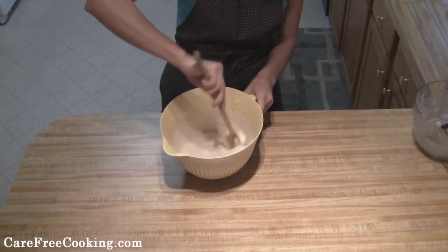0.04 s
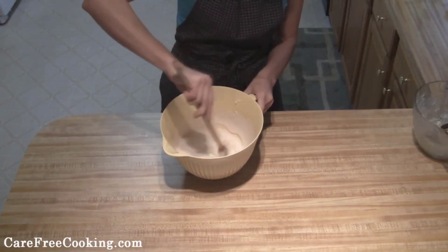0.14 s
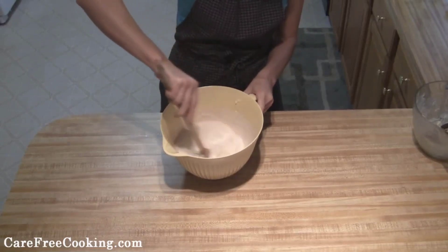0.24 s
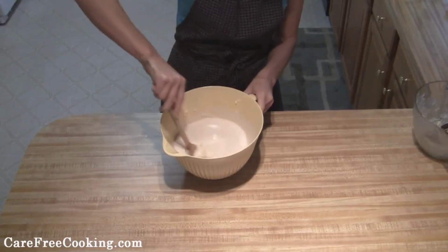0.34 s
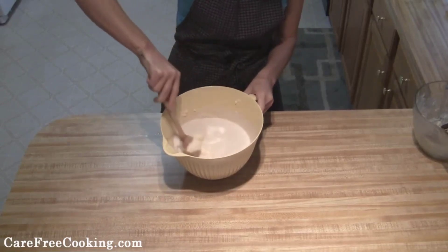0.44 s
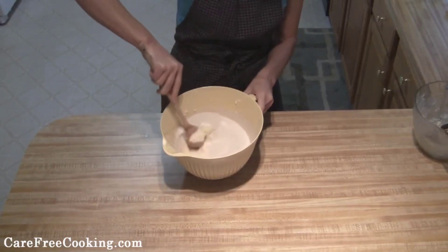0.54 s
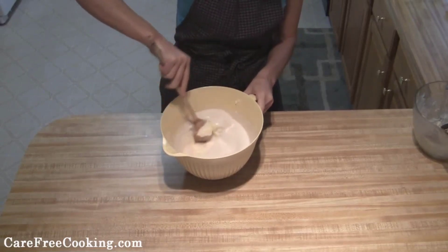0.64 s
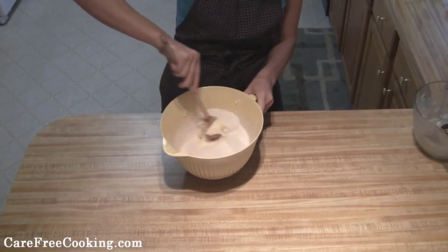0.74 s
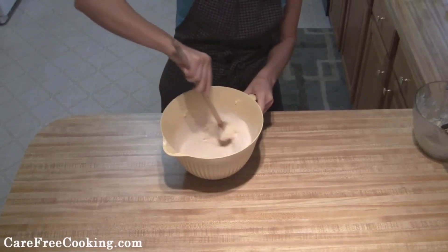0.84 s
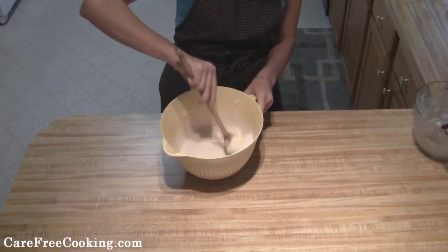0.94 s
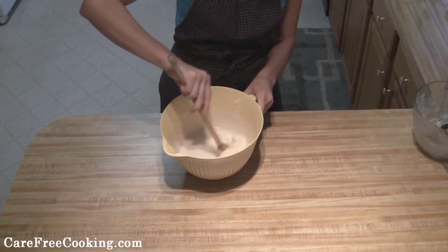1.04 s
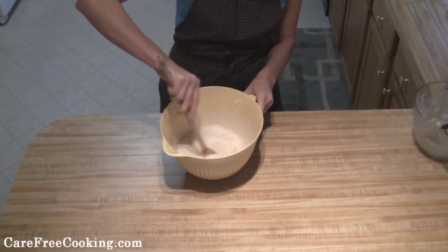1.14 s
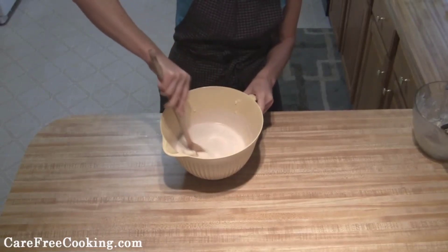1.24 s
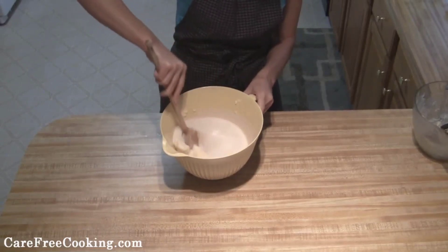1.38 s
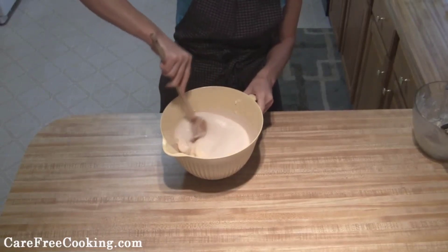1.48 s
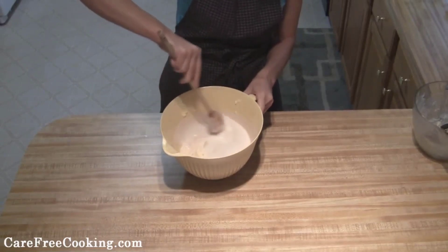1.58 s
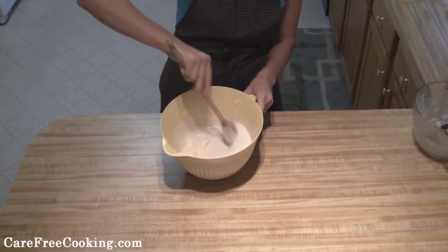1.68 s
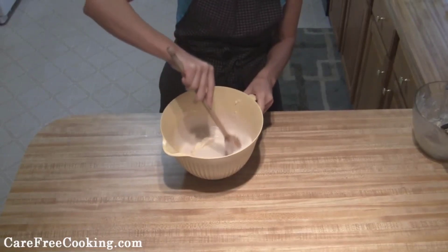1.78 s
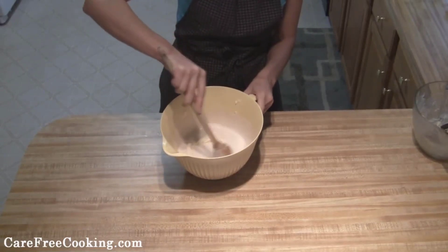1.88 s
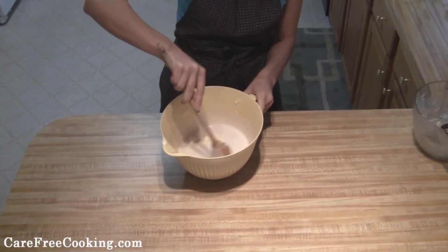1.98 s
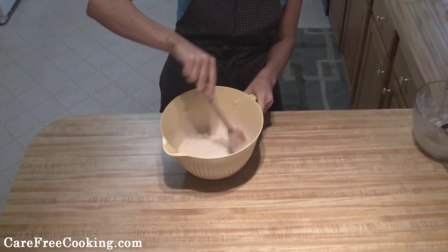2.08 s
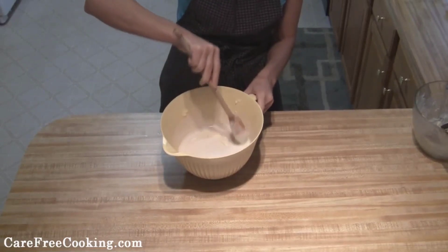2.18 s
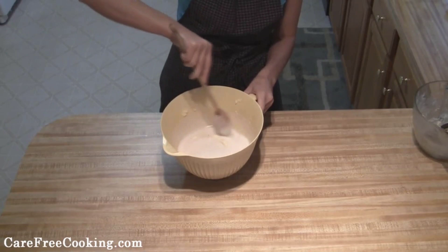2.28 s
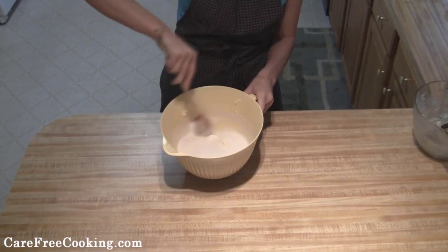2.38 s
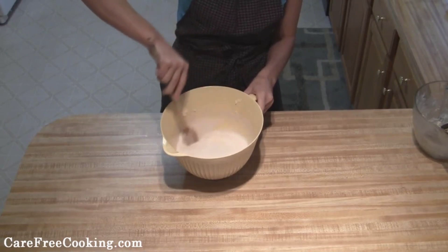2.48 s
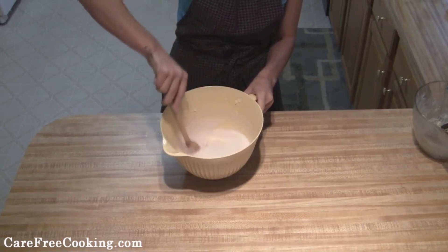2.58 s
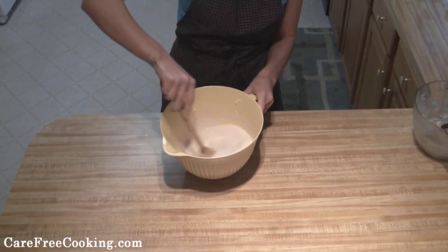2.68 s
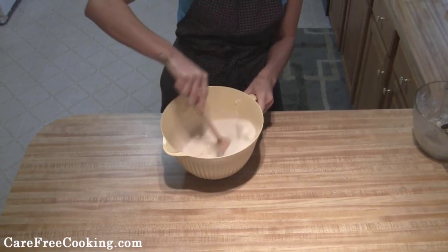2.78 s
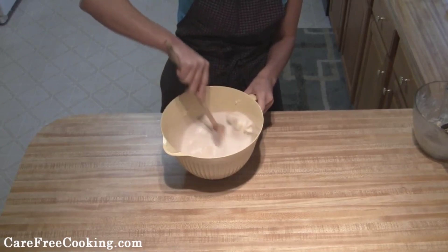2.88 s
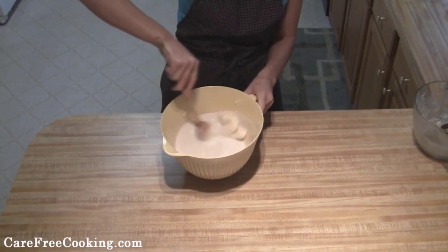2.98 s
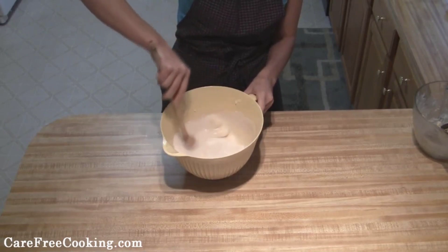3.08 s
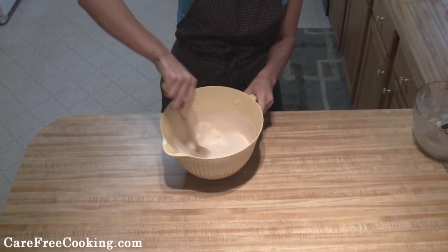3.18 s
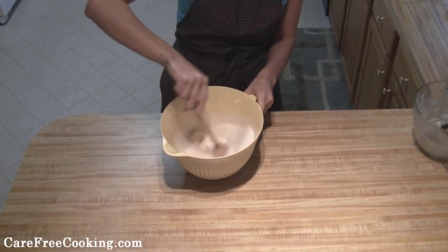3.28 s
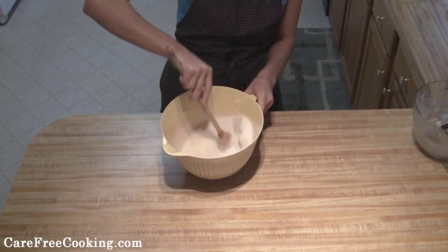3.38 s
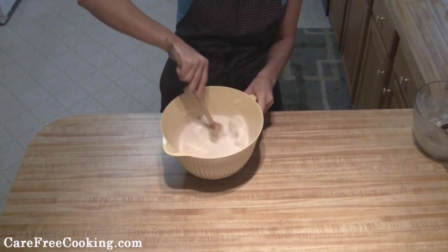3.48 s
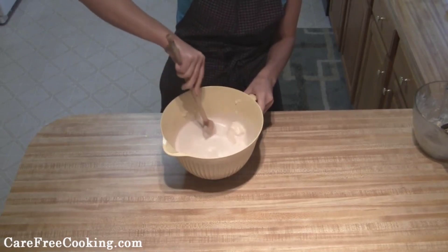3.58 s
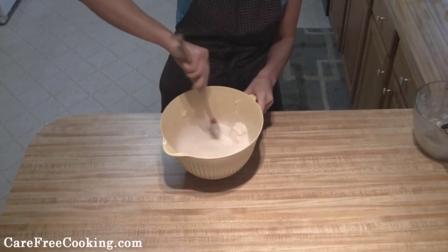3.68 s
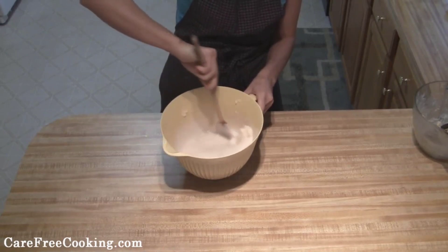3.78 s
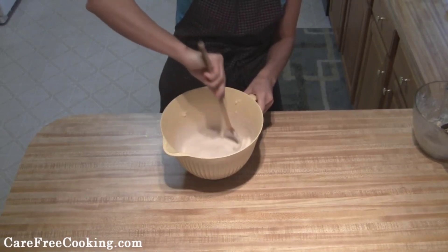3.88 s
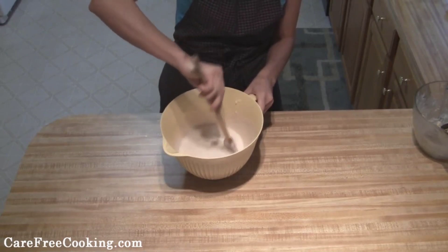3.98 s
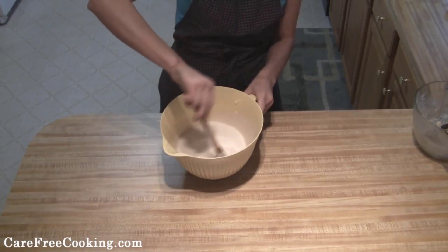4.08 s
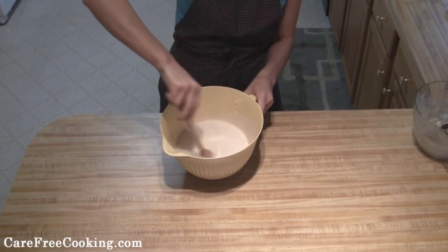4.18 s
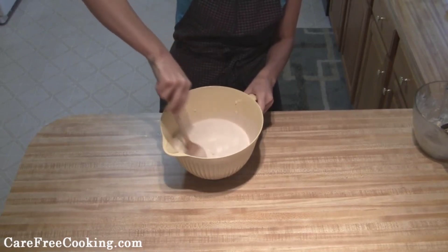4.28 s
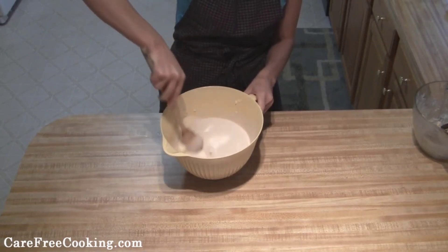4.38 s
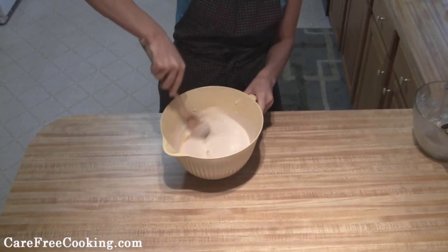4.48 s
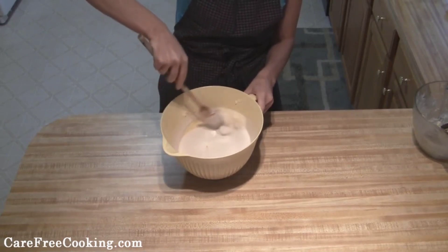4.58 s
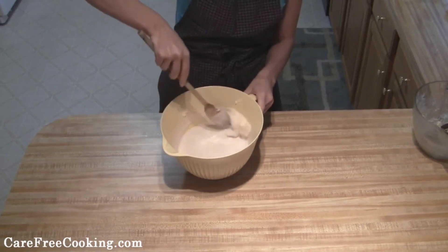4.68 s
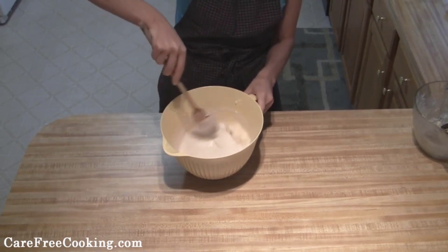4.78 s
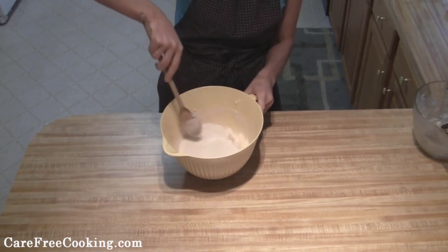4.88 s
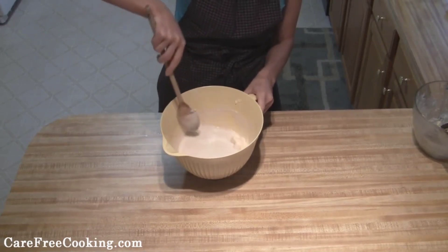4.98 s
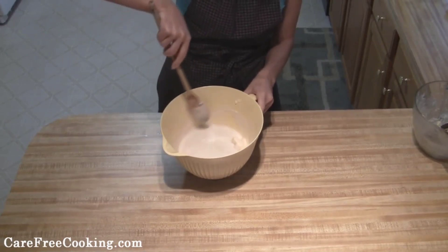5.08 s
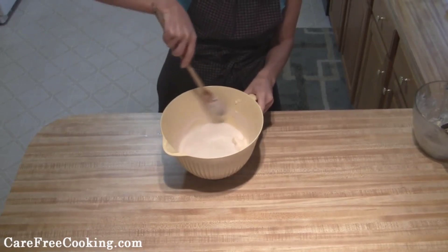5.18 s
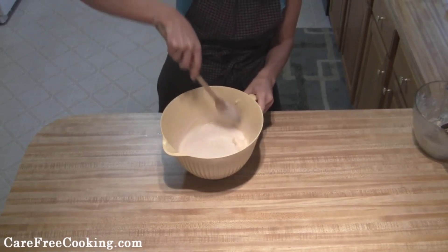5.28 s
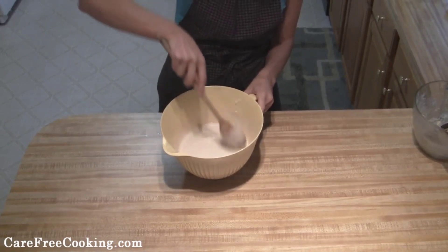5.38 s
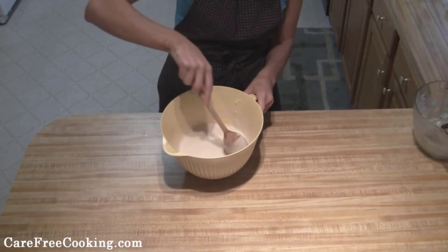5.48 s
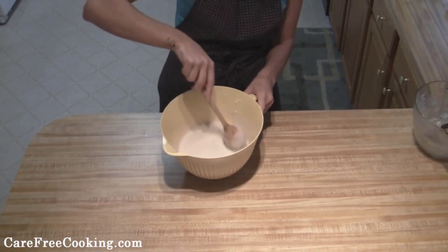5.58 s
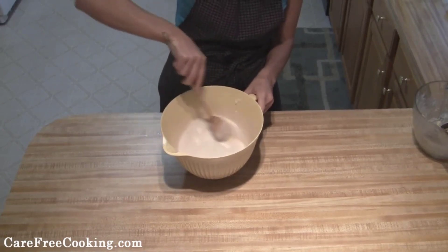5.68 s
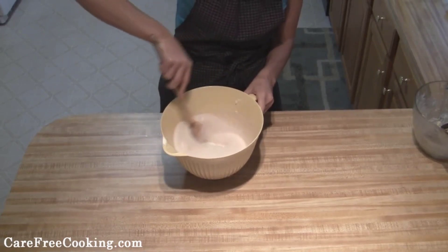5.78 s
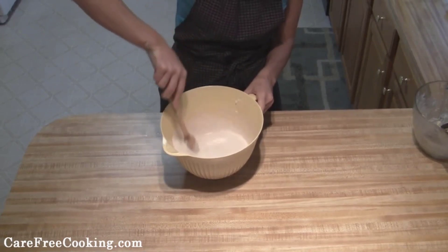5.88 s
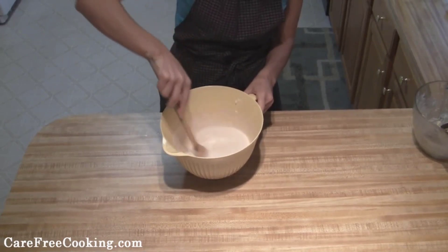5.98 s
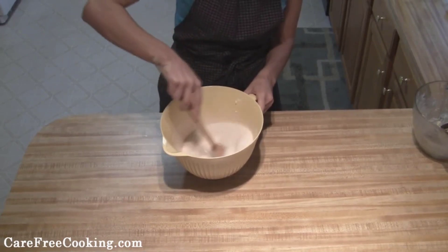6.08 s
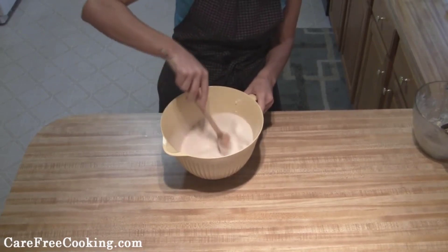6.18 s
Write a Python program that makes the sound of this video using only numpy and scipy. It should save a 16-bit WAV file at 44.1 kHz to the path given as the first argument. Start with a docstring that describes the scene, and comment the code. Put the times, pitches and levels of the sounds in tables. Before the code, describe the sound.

In a small kitchen, a wooden spoon stirs wet batter in a plastic bowl. Uneven, brisk strokes swish and slosh with dull thumps, tiny bubble pops and short hoarse scrapes. A soft low bump comes midway as the bowl rocks, then two loud woody knocks ring out in the last stretch. Close centred microphone, slight room echo, steady quiet hush.

```python
"""A wooden spoon stirs wet batter in a plastic bowl in a small kitchen, over a steady room hush.
From the start four bands of stick-slip noise plough, rub, swish and fizz, while touches thump modes,
bubbles ping, narrow noise bands squeak and air pockets hum in gliding resonances.
At 3.3 s the bowl rocks with a low thump; at 5.1 and 5.7 s the spoon knocks the bare wall, whose modes ring.
Echoes and a diffuse tail surround the bowl; loud knocks dip the level, which recovers slowly."""
import sys
import numpy as np
from scipy import signal
from scipy.fft import rfft, irfft
from scipy.io import wavfile
from scipy.ndimage import uniform_filter1d

SR = 44100
rng = np.random.default_rng(int(sys.argv[2]) if len(sys.argv) > 2 else 0)


def transcribe(u):
    """Save the signal u as a 16-bit wav file named by the first command-line argument.

    u: samples, shape (n,) or (channels, n), limited to [-1, 1]; the rate is SR.
    q: integer samples, one column per channel.
    """
    v = np.clip(np.atleast_2d(u).T, -1, 1)
    q = np.round(v * 32767).astype(np.int16)
    wavfile.write(sys.argv[1], SR, q)


N = 275336


def amp(db):
    """Decibels to gain."""
    return 10 ** (np.asarray(db) / 20)


def evened(x):
    """Scales to rms 1."""
    return x / np.sqrt(np.mean(x ** 2) + 1e-20)


def read(points, hz):
    """Interpolates a table on a log-frequency axis."""
    point_hz, value = np.transpose(points)
    return np.interp(np.log(hz + 1), np.log(point_hz + 1), value)


def add(mix, start_s, sound):
    """Mixes a sound in place at start_s, or at 0 if that is negative."""
    part = mix[max(round(start_s * SR), 0):][:len(sound)]
    part += sound[:len(part)]


def colour(x, points, size=4096):
    """Minimum-phase filter with the given spectrum (hz, db)."""
    log_gain = np.log(amp(read(points, abs(np.fft.fftfreq(size, 1 / SR)))))
    taps = np.fft.ifft(np.exp(np.conj(signal.hilbert(log_gain)))).real
    return signal.fftconvolve(x, taps[:size // 2])[:len(x)]


def whiten(x, width_hz):
    """Levels broad humps in a burst's spectrum, so that it drives all modes alike."""
    hz = np.fft.rfftfreq(len(x), 1 / SR)
    power = uniform_filter1d(abs(rfft(x)) ** 2, max(int(width_hz / hz[1]), 1))
    return colour(x, np.transpose([hz, -10 * np.log10(power + 1e-9)]))


def ring(hz, t60_s, db, size=22050):
    """Sum of exponentially dying modes."""
    t = np.arange(size)[:, None] / SR
    return (amp(db - 60 * t / t60_s) * np.sin(2 * np.pi * hz * t)).sum(1)


def resonate(x, hz, width_hz):
    """Resonance of peak gain 1 that follows the curve hz."""
    turn = np.exp(2j * np.pi * np.cumsum(hz) / SR)
    pole = np.exp(-np.pi * width_hz / SR)
    return 2 * (turn * signal.lfilter([1 - pole], [1, -pole], x / turn)).real


def blow(x, db, size=530):
    """Sets the rms level of the first 12 ms of a hit."""
    return amp(db) * x / np.sqrt(np.mean(x[:size] ** 2) + 1e-20)


def crunch(decay_s, grit, size=4096):
    """One sharp contact followed by a dying burst of tiny slips."""
    slips = rng.standard_normal(size) * np.exp(-np.arange(size) / (SR * max(decay_s, .0003)))
    burst = grit * np.sqrt(abs(decay_s) * 1000) * slips / np.linalg.norm(slips)
    burst[0] += 1
    return burst


def friction(per_s, spread_db, smooth, judder_db, size=700):
    """Stick-slip grains of uneven size over a smooth hiss, clumped by the judder of the spoon."""
    sizes = amp(spread_db * np.minimum(rng.exponential(1, N), 4))
    grains = sizes * rng.choice([-1, 1], N) * (rng.random(N) < per_s / SR)
    judder = evened(uniform_filter1d(uniform_filter1d(rng.standard_normal(N), size), size // 2))
    return (evened(grains) + smooth * rng.standard_normal(N)) * amp(judder_db * judder)


# spectrum of quiet kitchen and microphone: hz, relative_db_per_hz
HUSH_SPECTRUM = [(10, -26), (28, -12), (52, -6), (70, 2), (95, -6), (155, -3), (210, -10), (400, -12),
                 (900, -18), (2500, -22.5), (6500, -26), (9200, -22.5), (11000, -27.5), (13300, -37)]
# side against mid: hz, side_db
HUSH_SIDE = [(30, -7), (70, -14), (150, -4.5), (230, 2), (400, 4), (1000, 3), (1500, 0), (1750, 4),
             (2000, -1), (3000, -1), (3900, -2), (4500, -24), (9000, -28)]
HUSH_MID_DB = -58.2


def hush():
    """Steady room rumble and microphone hiss, much wider than the bowl; returns mid and side."""
    mid, side = (evened(colour(rng.standard_normal(N), HUSH_SPECTRUM)) for _ in range(2))
    return amp(HUSH_MID_DB) * np.array([mid, colour(side, HUSH_SIDE)])


def stroke(t, start_s, length_s, attack_s, release_s, sag_db_per_s):
    """One push of the spoon: a quick rise, a slowly sagging hold, a dying release."""
    age_s = np.maximum(t - start_s, 0)
    rise = np.minimum(age_s / attack_s, 1)
    release = np.exp(-np.maximum(age_s - length_s, 0) / release_s)
    return rise * amp(sag_db_per_s * age_s) * release


# settling of the batter between strokes: time_s, relative_db
SETTLING_LEVEL = [(0, -65), (.8, -66), (2.3, -65), (3.5, -64), (4.75, -68), (5.0, -73), (5.6, -69),
                  (6.24, -64)]
SETTLING_DRAG_DB, SETTLING_FIZZ_DB = 5, -4
# ploughing through the batter: start_s, length_s, drag_db, swish_db, swish_hz; levels before sag and trim
PLOUGHS = [(-0.03, .11, -52, -56, 4300), (0.29, .29, -56.5, -52.5, 4600), (0.97, .16, -53.5, -56.5, 3100),
           (1.125, .105, -50, -53, 3600), (1.3, .37, -49, -55.2, 3100), (1.715, .2, -55, -50.5, 3800),
           (1.94, .13, -48, -51.5, 3000), (2.71, .28, -56, -58, 3200), (3.02, .23, -53.5, -56, 3200),
           (3.255, .185, -47.5, -52.5, 3700), (3.55, .24, -55, -59, 3400), (3.93, .2, -52, -55, 2800),
           (4.21, .52, -53.5, -53.2, 4400), (6.02, .24, -50.5, -58, 3400)]
SWEEP_ATTACK_S, SWEEP_RELEASE_S, SWEEP_SAG_DB_PER_S = .03, .035, -6.5  # digs in, slides out, slows
DRAG_EXTRA_SAG_DB_PER_S = -9  # drag eases sooner than swish as the batter gives way
# sweep friction against the swish, at its usual pitch: a higher swish means more fizz and less rub
USUAL_HZ, COATED_RING_SHARE = 3300, .08  # share of ringing where batter coats the wall
FIZZ_DB, FIZZ_DB_PER_OCTAVE, RUB_DB, RUB_DB_PER_OCTAVE = -2.4, 1.2, -4.3, -6
# scraping along the wall; levels before sag and trim:
# start_s, length_s, swell_s, rub_db, swish_db, fizz_db, swish_hz, ringing_share
WALL_SCRAPES = [(0.108, .08, .012, -50, -50, -49, 2700, .15), (0.19, .1, .04, -57, -56, -55.5, 3900, .1),
                (2.17, .065, .035, -60, -51, -56, 2900, .2), (2.35, .062, .04, -60, -50.5, -56, 3100, .25),
                (2.53, .075, .05, -57, -50.5, -58, 3700, .1), (3.655, .035, .015, -55, -58, -58, 3000, .15),
                (4.01, .02, .012, -56, -55, -62, 2500, .2), (5.2, .125, .1, -45, -41.5, -53.5, 2800, .2),
                (5.325, .075, .025, -55, -49, -58, 2800, .15), (5.545, .035, .025, -61, -63, -70, 2800, .3),
                (5.735, .19, .06, -55, -49.5, -52.5, 2900, .2)]
SCRAPE_RELEASE_S, SCRAPE_SAG_DB_PER_S, SCRAPE_DRAG_DB = .025, -18, -7  # drag against swish


def strokes(count=3000):
    """Power-sums settling, sweeps and scrapes into four friction levels, swish pitch and ringing share."""
    t = np.linspace(0, N / SR, count)
    idle = amp(np.interp(t, *np.transpose(SETTLING_LEVEL)))
    parts = [(idle * amp(SETTLING_DRAG_DB), idle, idle, idle * amp(SETTLING_FIZZ_DB),
              USUAL_HZ, COATED_RING_SHARE)]
    for start_s, length_s, drag_db, swish_db, hz in PLOUGHS:
        push = stroke(t, start_s, length_s, SWEEP_ATTACK_S, SWEEP_RELEASE_S, SWEEP_SAG_DB_PER_S)
        drag = push * amp(drag_db + DRAG_EXTRA_SAG_DB_PER_S * np.maximum(t - start_s, 0))
        swish = push * amp(swish_db)
        octaves = np.log2(hz / USUAL_HZ)
        rub = swish * amp(RUB_DB + RUB_DB_PER_OCTAVE * octaves)
        fizz = swish * amp(FIZZ_DB + FIZZ_DB_PER_OCTAVE * octaves)
        parts.append((drag, rub, swish, fizz, hz, COATED_RING_SHARE))
    for start_s, length_s, swell_s, rub_db, swish_db, fizz_db, hz, ringing in WALL_SCRAPES:
        push = stroke(t, start_s, length_s, swell_s, SCRAPE_RELEASE_S, SCRAPE_SAG_DB_PER_S)
        levels_db = (swish_db + SCRAPE_DRAG_DB, rub_db, swish_db, fizz_db)
        drag, rub, swish, fizz = (push * amp(db) for db in levels_db)
        parts.append((drag, rub, swish, fizz, hz, ringing))
    drag, rub, swish, fizz, hz, ringing = map(np.array, zip(*parts))
    levels_db = [10 * np.log10((gain ** 2).sum(0)) for gain in (drag, rub, swish, fizz)]
    lead = swish ** 2 / (swish ** 2).sum(0)  # swish power weights pitch and ringing
    curves = (*levels_db, hz @ lead, ringing @ lead)
    return [np.interp(np.arange(N) / SR, t, curve) for curve in curves]


# modes of bowl and spoon, undamped: hz, t60_s, spot_0_db, spot_1_db
BOWL_MODES = [(150, .35, -42, -41), (258, .22, -42, -44), (272, .04, -22.5, -23.5), (415, .33, -31, -39),
              (452, .2, -47, -48), (517, .2, -49, -43), (605, .25, -39, -40), (690, .024, -15, -32),
              (697, .25, -41, -52), (818, .28, -39, -55), (931, .2, -40, -54), (985, .05, -32, -27),
              (1066, .15, -38, -51), (1141, .2, -37, -49), (1150, .02, -22, -26.5), (1178, .2, -40, -46),
              (1309, .28, -39, -56), (1350, .025, -18, -44), (1394, .2, -42, -60), (1626, .15, -47, -51),
              (1788, .2, -38, -63), (1965, .03, -28, -58), (2045, .17, -38, -60), (2280, .15, -48, -46),
              (2403, .028, -42, -28), (2570, .035, -37, -29.5), (2900, .14, -48, -44),
              (3160, .05, -41, -47), (3430, .12, -44, -49), (3750, .1, -46, -48)]


def excite(x, share, spot, damping):
    """Friction also wakes the bowl's modes, shortened by the batter on the wall."""
    hz, t60_s, *mode_db = np.transpose(BOWL_MODES)
    modes = ring(hz, t60_s * damping, np.array([1 - spot, spot]) @ mode_db)
    ringing = evened(signal.fftconvolve(x, modes)[:N])
    return (evened(x) + share * ringing) / (1 + .5 * share)


def slurp(x, patchy_db, patch_hz, patch_s):
    """Wet films open and close: coloured patches come and go in the friction."""
    hz, when, z = signal.stft(x, SR, nperseg=512, noverlap=384)
    field = rng.standard_normal(z.shape)
    for axis, width in enumerate((patch_hz / hz[1], patch_s / when[1])):
        bell = signal.windows.gaussian(41, max(width / 2.355, .3))  # 2.355: full width at half height
        field = signal.fftconvolve(field, np.expand_dims(bell, 1 - axis), "same")
    return signal.istft(z * amp(patchy_db * evened(field)), SR, nperseg=512, noverlap=384)[1][:N]


# friction spectra: hz, relative_db_per_hz
DRAG_SPECTRUM = [(90, -22), (200, -6.5), (290, -2.5), (380, -2), (470, -4), (590, -2), (700, -4.5),
                 (880, -19), (1500, -36)]
RUB_SPECTRUM = [(550, -25), (850, -8.5), (1000, -5), (1180, -1), (1350, -2), (1550, -4.5), (1780, -2.5),
                (2050, -8), (3000, -30)]
SWISH_SPECTRUM = [(1400, -20), (2000, -4), (2500, 3), (2950, -1), (3500, -3), (4500, -1.5), (5500, -3),
                  (7500, -17)]
FIZZ_SPECTRUM = [(4000, -22), (6000, -2), (7100, -3), (8700, .7), (9800, -1.5), (11000, -7), (12300, -15),
                 (13300, -28)]


def stirring():
    """The strokes drive four kinds of friction, from the dull drag to the wet fizz."""
    drag_db, rub_db, swish_db, fizz_db, pocket_hz, ringing = strokes()
    drag = colour(friction(per_s=400, spread_db=2.0, smooth=.9, judder_db=1.0), DRAG_SPECTRUM)
    rub = colour(friction(per_s=550, spread_db=3.1, smooth=.45, judder_db=1.2), RUB_SPECTRUM)
    rub = excite(rub, ringing, spot=.7, damping=.35)
    rub = slurp(rub, patchy_db=2.8, patch_hz=250, patch_s=.025)
    swish = colour(friction(per_s=1500, spread_db=3.6, smooth=.7, judder_db=.9), SWISH_SPECTRUM)
    swish = excite(swish, ringing, spot=.9, damping=.5)
    swish = slurp(swish, patchy_db=1.5, patch_hz=400, patch_s=.025)
    swish = resonate(swish, pocket_hz, width_hz=2100)  # hollow behind the spoon
    fizz = colour(friction(per_s=1800, spread_db=3.8, smooth=.8, judder_db=1.2), FIZZ_SPECTRUM)
    return (amp(drag_db - 2.6) * evened(drag) + amp(rub_db - 2.5) * evened(rub)
            + amp(swish_db - 2.5) * evened(swish) + amp(fizz_db - 1.7) * evened(fizz))


# thud and hollow against the sweep's drag, clack and snap against its swish
BUMPS_PER_S, BUMP_THUD_DB, BUMP_HOLLOW_DB, BUMP_CLACK_DB, BUMP_SNAP_DB = 3, -2, -7, -8, -7
BUMP_LOW_HZ, BUMP_HIGH_HZ, BUMP_CLACK_HZ, BUMP_DECAY_S = 240, 350, 1900, .004


def bumps(count=8):
    """Faint chance touches during the sweeps, as rows like those of TOUCHES."""
    rows = []
    for start_s, length_s, drag_db, swish_db, _ in PLOUGHS:
        for chance, when, place in rng.random((count, 3)):
            if chance < BUMPS_PER_S * length_s / count:
                thud_hz = BUMP_LOW_HZ + (BUMP_HIGH_HZ - BUMP_LOW_HZ) * place
                rows.append((start_s + when * length_s, drag_db + BUMP_THUD_DB, thud_hz,
                             drag_db + BUMP_HOLLOW_DB, swish_db + BUMP_CLACK_DB, BUMP_CLACK_HZ,
                             swish_db + BUMP_SNAP_DB, BUMP_DECAY_S))
    return rows


# spoon meets bowl; levels and decay before trims:
# time_s, thud_db, thud_hz, hollow_db, clack_db, clack_hz, snap_db, decay_s
TOUCHES = [(0.0196, -62, 290, -63, -54, 1400, -41, 0.0017), (0.3114, -51, 285, -58, -49, 1300, -49, 0.004),
           (0.3226, -52, 295, -60, -50, 1350, -48, 0.004),
           (0.4727, -61, 330, -53, -54, 2600, -42.5, 0.0046),
           (0.9607, -42, 295, -62, -61, 2000, -54, 0.005), (1.1455, -39, 280, -45, -39, 1700, -40, 0.003),
           (1.156, -39, 275, -42.5, -42, 1500, -45, 0.0044),
           (1.3012, -36, 280, -41, -47.5, 2100, -46.5, 0.007),
           (1.324, -44, 240, -48, -55, 1050, -58, 0.006), (1.5356, -51, 285, -42, -45, 1500, -49, 0.006),
           (1.6805, -46, 260, -48, -58, 800, -59, 0.005), (1.7199, -52, 270, -58, -50, 1400, -40, 0.0035),
           (1.8184, -55, 325, -57, -49, 2200, -45, 0.0025), (1.869, -49, 305, -54, -44, 1700, -48, 0.003),
           (1.878, -52, 305, -57, -46, 2000, -52, 0.006), (1.9423, -37, 285, -41, -43, 1100, -49, 0.0024),
           (1.9492, -40, 290, -44, -52, 900, -60, 0.005), (2.0219, -46, 300, -53, -45, 1800, -43.5, 0.0037),
           (2.2251, -51, 240, -56, -66, 2400, -60, 0.002), (2.4403, -68, 330, -55, -42, 850, -50, 0.004),
           (2.595, -54, 235, -63, -63, 2100, -58, 0.005), (2.7047, -49, 240, -67, -60, 2200, -59, 0.005),
           (2.7914, -49, 315, -66, -65, 2200, -59, 0.006), (3.2274, -55, 315, -51, -49, 900, -55, 0.003),
           (3.247, -40, 265, -50, -57, 900, -53, 0.005), (3.2736, -40, 270, -54, -52, 1700, -42, 0.0035),
           (3.305, -48, 250, -58, -62, 1700, -58, 0.005), (3.331, -41, 260, -59, -62, 2300, -63, 0.006),
           (3.4062, -58, 295, -60, -55, 2200, -52, 0.003), (3.6644, -60, 280, -64, -55, 1400, -55, 0.008),
           (3.8086, -60, 240, -75, -59, 2000, -49, 0.006), (3.8784, -71, 255, -63, -66, 1700, -51, 0.002),
           (3.912, -66, 270, -66, -62, 2700, -55, 0.009), (3.9452, -39, 275, -53, -55, 1700, -53, 0.0055),
           (3.9722, -54, 315, -55, -51, 2500, -49, 0.002), (4.0223, -47, 240, -58, -46.5, 2200, -55, 0.003),
           (4.1932, -46, 280, -48, -49, 1200, -55, 0.0045), (4.2402, -67, 270, -64, -70, 2000, -52, 0.006),
           (4.3473, -48, 300, -66, -60, 1500, -56, 0.005), (4.5048, -46, 285, -57, -51, 2000, -44, 0.0025),
           (5.265, -64, 330, -58, -56, 1000, -51, 0.006), (6.0476, -51, 290, -62, -56, 1500, -55, 0.006),
           (6.2167, -41, 295, -51, -44, 1800, -45, 0.006)]
# bowl bottom damped by batter: thud_hz_multiple, t60_s, relative_db
BOTTOM_MODES = [(.58, .045, -15), (.83, .025, -10), (1, .03, 0), (1.24, .03, -8.5), (1.5, .04, -12)]
# hollow of the bowl, before detuning: hz, t60_s, relative_db
HOLLOW_MODES = [(490, .04, -8), (605, .065, 0), (700, .05, -4)]
# weak deep bass of a small bowl: hz, gain_db
THUD_BASS = [(20, -22), (90, -9), (150, 0)]
# spectra of wood clack and film snap: hz, relative_db
CLACK_SPECTRUM = [(400, -20), (620, -7), (820, -1), (1200, 0), (1750, -.5), (2100, -3), (2550, -1),
                  (3100, -6), (5000, -25)]
SNAP_SPECTRUM = [(1800, -22), (3100, -4), (4500, 3), (5600, -2), (7000, -5), (8900, -1), (10500, -7),
                 (12300, -19), (13300, -32)]
THUD_RISE_S = .0018
CLACK_HUMP_DB, CLACK_SPAN_RATIO = 6, 1.5  # each spot favours one part of the clack


def contacts():
    """Each touch thumps the loaded bottom, sounds the hollow, clacks the wood and snaps a batter film."""
    out = np.zeros(N)
    ratio, t60_s, db = np.transpose(BOTTOM_MODES)
    hollow_hz, hollow_t60_s, hollow_mode_db = np.transpose(HOLLOW_MODES)
    for time_s, thud_db, thud_hz, hollow_db, clack_db, clack_hz, snap_db, decay_s in TOUCHES + bumps():
        load = 1 + .03 * rng.standard_normal(len(hollow_hz))  # shifting batter detunes the hollow
        thud = ring(thud_hz * ratio, t60_s, db)
        cushion = 1 - np.exp(-np.arange(len(thud)) / (SR * THUD_RISE_S))  # batter softens the push
        add(out, time_s, blow(colour(thud * cushion, THUD_BASS), thud_db - 1.0))
        hollow = ring(hollow_hz * load, hollow_t60_s, hollow_mode_db) * cushion
        add(out, time_s, blow(hollow, hollow_db - .5))
        clack = colour(whiten(crunch(decay_s * 1.1, grit=1.05), width_hz=500), CLACK_SPECTRUM)
        hump = [(clack_hz / CLACK_SPAN_RATIO, 0), (clack_hz, CLACK_HUMP_DB), (clack_hz * CLACK_SPAN_RATIO, 0)]
        add(out, time_s, blow(colour(clack, hump), clack_db - .6))
        snap = colour(crunch(decay_s * 1.05, grit=1.15), SNAP_SPECTRUM)
        add(out, time_s, blow(snap, snap_db - .5))
    return out


# bubbles burst as the spoon lands: time_s, start_hz, level_db
LOUD_POPS = [(0.0196, 4500, -41), (0.4727, 4500, -51), (1.7199, 4750, -41), (3.8086, 4600, -56),
             (4.5048, 4750, -46)]
POP_T60_S, POP_RISE_PER_S = .007, 9
# tiny bubbles during the sweeps, level against the swish
CRACKLE_PER_S, CRACKLE_DB, CRACKLE_SPREAD_DB, CRACKLE_LOW_HZ, CRACKLE_HIGH_HZ = 45, -12, 3, 1100, 5500


def pops(count=40, size=1024):
    """Bubbles burst with a brief rising ping: a few loud ones, and a faint crackle through the sweeps."""
    out, t, rows = np.zeros(N), np.arange(size) / SR, list(LOUD_POPS)
    for start_s, length_s, _, swish_db, _ in PLOUGHS:
        for chance, when, pitch, strength in rng.random((count, 4)):
            if chance < CRACKLE_PER_S * length_s / count:
                hz = CRACKLE_LOW_HZ * (CRACKLE_HIGH_HZ / CRACKLE_LOW_HZ) ** pitch
                db = swish_db + CRACKLE_DB + CRACKLE_SPREAD_DB * min(-np.log(strength), 2)
                rows.append((start_s + when * length_s, hz, db))
    for time_s, hz, db in rows:
        tone = np.sin(2 * np.pi * hz * t * (1 + POP_RISE_PER_S * t / 2))
        add(out, time_s, blow(tone * amp(-60 * t / POP_T60_S), db))
    return out


# hoarse squeaks on the wall: start_s, length_s, from_hz, to_hz, level_db
WOOD_SQUEAKS = [(0.075, .115, 1280, 1180, -55), (0.122, .02, 2330, 2400, -54),
                (0.16, .035, 2380, 2330, -54), (0.21, .085, 1280, 1500, -58), (1.72, .1, 2620, 2600, -61),
                (2.185, .05, 3150, 3250, -59), (2.235, .05, 2400, 1850, -62), (2.38, .05, 2520, 2600, -58),
                (5.21, .12, 860, 1020, -50), (5.235, .045, 2520, 2540, -49.5), (5.295, .05, 630, 600, -51),
                (5.375, .05, 2540, 2500, -52.5), (5.56, .03, 840, 880, -60), (5.74, .11, 2420, 2400, -59)]
SQUEAK_WIDTH_HZ, SQUEAK_SKIRT_HZ = 240, 750


def squeaks():
    """Where wood drags on thinly coated plastic, its slips crowd into a narrow, gliding band."""
    out = np.zeros(N)
    slips = friction(per_s=700, spread_db=3, smooth=.4, judder_db=2.0, size=350)
    for start_s, length_s, from_hz, to_hz, db in WOOD_SQUEAKS:
        u = np.linspace(0, 1, round(length_s * SR))
        hz = from_hz + (to_hz - from_hz) * u
        band = resonate(slips[round(start_s * SR):][:len(u)], hz, SQUEAK_WIDTH_HZ)
        band = resonate(band, hz, SQUEAK_SKIRT_HZ)
        add(out, start_s, amp(db) * evened(band * np.sqrt(u * (1 - u))))
    return out


# air pockets: start_s, length_s, from_hz, to_hz, level_db (before trim)
AIR_GULPS = [(.118, .025, 430, 500, -51), (.47, .17, 530, 580, -62), (1.315, .06, 380, 345, -47),
             (1.955, .13, 560, 400, -52), (1.98, .08, 280, 255, -54), (3.25, .05, 590, 750, -53),
             (3.345, .075, 170, 380, -49), (3.41, .05, 560, 760, -56), (3.95, .1, 250, 360, -49),
             (4.52, .05, 540, 570, -56)]


def gulps():
    """Air pockets behind the spoon hum and glide as the batter opens or closes them."""
    out = np.zeros(N)
    for start_s, length_s, from_hz, to_hz, db in AIR_GULPS:
        u = np.linspace(0, 1, round(length_s * SR))
        hz = from_hz + (to_hz - from_hz) * u
        hum = resonate(rng.standard_normal(len(u)), hz, width_hz=90)
        hum = resonate(hum, hz, width_hz=160)
        add(out, start_s, amp(db - 1) * evened(hum * np.sqrt(u) * (1 - u)))
    return out


# bowl on the counter: hz, t60_s, level_db
ROCK_MODES = [(68, .25, -51), (105, .15, -48), (150, .15, -46)]


def rocking():
    """A hard push rocks the bowl on the counter: one soft, low thump."""
    out = np.zeros(N)
    add(out, 3.338, ring(*np.transpose(ROCK_MODES)))
    return out


def bend(x, lag_s, corner_hz):
    """Bending waves cross the wall more slowly the lower they are: the treble arrives first."""
    hz = np.fft.rfftfreq(len(x), 1 / SR)
    delay_s = lag_s / np.sqrt(1 + hz / corner_hz)
    return irfft(rfft(x) * np.exp(-2j * np.pi * np.cumsum(delay_s) * hz[1]), len(x))


# hard knocks: time_s, force_db, wall_spot (0-1), chatter_decay_s
WALL_KNOCKS = [(5.1243, 0, 0.0, .005), (5.6508, 0, 1.0, .011)]
# many damped wall modes merged into a clack: hz, spot_0_db, spot_1_db (relative)
WALL_SPECTRUM = [(110, -35, -31), (200, -25, -22), (280, -9, -8), (350, -7, -8), (430, -4, -3),
                 (520, -8, -5), (670, 0, -4), (840, 0, -11), (1050, -3.5, -9), (1380, 0, -15),
                 (1650, -3, -12), (1980, -2.5, -16), (2430, -9, -5), (3100, -13, -12), (3900, -9, -13),
                 (4600, -22, -17), (6000, -39, -29), (12000, -62, -47)]
WALL_RING_DB, WALL_T60_S = -13, .25  # lingering crowd of modes, against the strike


def knocks():
    """Wood strikes the bare wall and chatters: modes favoured by the spot ring over a dense clack."""
    out = np.zeros(N)
    hz, t60_s, *mode_db = np.transpose(BOWL_MODES)
    wall_hz, *wall_db = np.transpose(WALL_SPECTRUM)
    radiation = [(20, -30), (100, -14), (150, -2), (200, -4), (250, 0), (3900, 0), (6000, -20)]  # hz, db
    for time_s, force_db, spot, chatter_s in WALL_KNOCKS:
        share = np.clip([1 - spot, spot], 0, 1)
        modes = colour(ring(hz, t60_s, share @ mode_db), radiation)
        strike = whiten(crunch(chatter_s, grit=.6, size=len(modes)), width_hz=120)
        t = np.arange(len(modes)) / SR
        crowd = rng.standard_normal(len(t)) * amp(-60 * t / WALL_T60_S)
        wall = strike / np.linalg.norm(strike) + amp(WALL_RING_DB) * crowd / np.linalg.norm(crowd)
        clack = amp(13.5) * colour(wall, np.transpose([wall_hz, share @ wall_db]))
        add(out, time_s, amp(force_db) * bend(modes + clack, lag_s=.006, corner_hz=120))
    return out


# decay of the room: hz, t60_s
KITCHEN_DECAY = [(120, .5), (320, .55), (840, .55), (2400, .55), (5000, .36), (11000, .25)]
# spectrum of the tail: hz, relative_db
KITCHEN_TAIL = [(100, -4), (170, -1.5), (275, -4), (400, 0), (700, -2.5), (1400, -2.5), (2600, -2),
                (5000, -6), (11000, -8)]
# counter and near walls: delay_s, level_db
NEAR_SURFACES = [(.0037, -11), (.0063, -14), (.0108, -15), (.0142, -17), (.0235, -18)]


def kitchen(x, wet_db, size=32768):
    """Echoes from the counter and near walls, then a tail of sparse taps; returns mid and side."""
    t = np.arange(size) / SR
    taps_per_s = 4000
    signs = rng.choice([-1., 1.], (2, size))
    taps = signs * (rng.random((2, size)) < taps_per_s / SR) * np.clip((t - .005) / .012, 0, 1)
    hz, when, z = signal.stft(taps, SR, nperseg=256)
    t60_s = read(KITCHEN_DECAY, hz)[:, None]
    z = z * amp(read(KITCHEN_TAIL, hz)[:, None] - 60 * when / t60_s)
    z = z * np.sqrt(np.log(1e6) / (taps_per_s * t60_s))  # evens tail energy over decay times
    response = amp(wet_db) * signal.istft(z, SR, nperseg=256)[1]
    for delay_s, db in NEAR_SURFACES:
        add(response[0], delay_s, amp([db]))
    mid, side = signal.fftconvolve(x[None], response, axes=1)[:, :N]
    return np.array([x + mid, side])


# width of the room's tail: hz, side_db (against mid)
TAIL_SIDE = [(40, -15), (150, -13.5), (300, -7.2), (650, -7.5), (1200, -8.5), (2300, -8), (3700, -8),
             (4500, -22), (9000, -22)]


def scene():
    """The bowl stands in the centre; only the kitchen's diffuse tail and the hush have width."""
    rubbed = kitchen(stirring() + squeaks(), wet_db=-2)
    struck = kitchen(contacts() + pops() + gulps() + rocking(), wet_db=-2)
    mid, side = rubbed + struck + kitchen(knocks(), wet_db=-.5)
    mid, side = np.array([mid, colour(side, TAIL_SIDE)]) + hush()
    return np.array([mid + side, mid - side])


THRESHOLD_DB, RATIO, RECOVERY_DB_PER_S, EDGE_HZ = -30, 1.2, 2, 12950


def record(dry):
    """Gain control turns loud sound down and recovers slowly; then a low-pass limits the band."""
    power = signal.lfilter([1 / 400], [1, 1 / 400 - 1], (dry ** 2).mean(0))  # 9 ms smoothing
    cut_db = np.maximum(10 * np.log10(power + 1e-12) - THRESHOLD_DB, 0) * (1 - 1 / RATIO)
    recovery_db = RECOVERY_DB_PER_S * np.arange(N) / SR
    ducked = dry * amp(recovery_db - np.maximum.accumulate(cut_db + recovery_db))
    low_pass = signal.firwin(511, EDGE_HZ, window=("kaiser", 9), fs=SR)
    return signal.oaconvolve(ducked, low_pass[None], "same")


dry = scene()
out = record(dry)
transcribe(out)
```